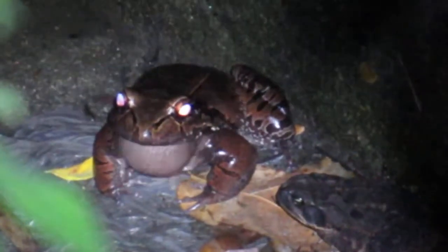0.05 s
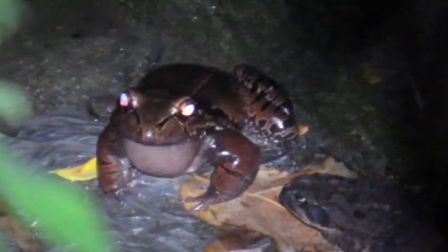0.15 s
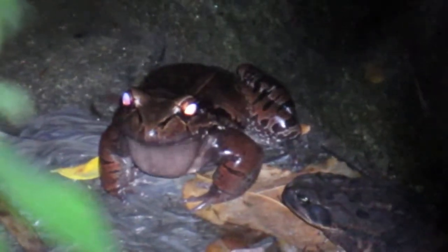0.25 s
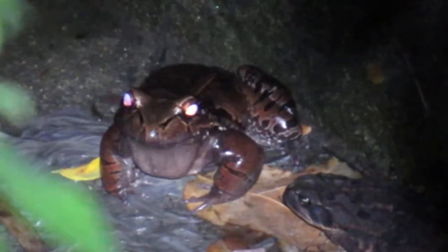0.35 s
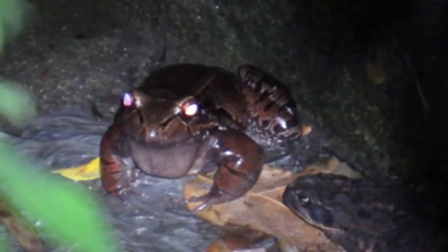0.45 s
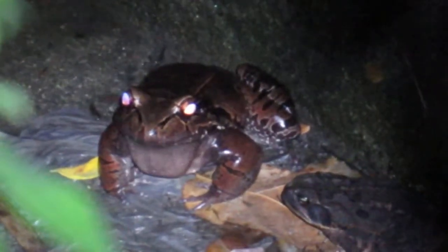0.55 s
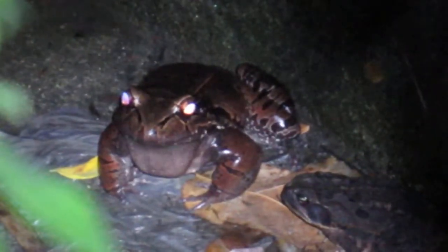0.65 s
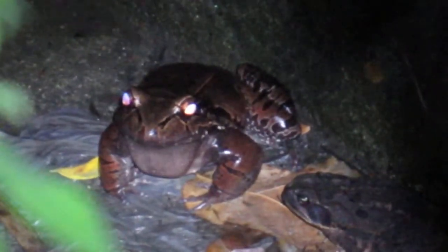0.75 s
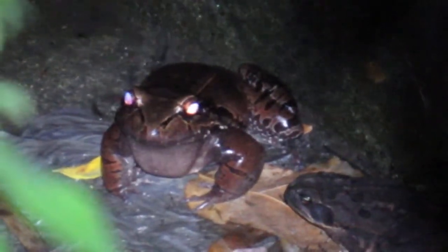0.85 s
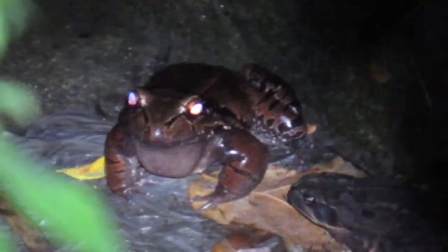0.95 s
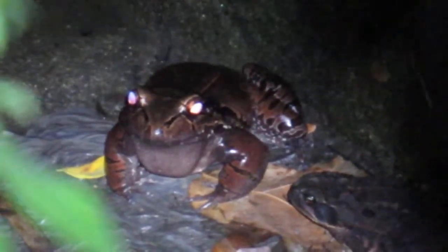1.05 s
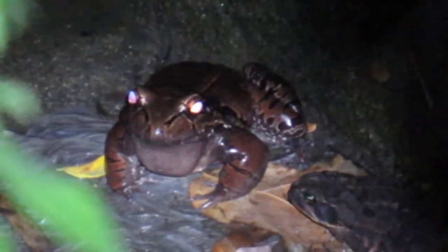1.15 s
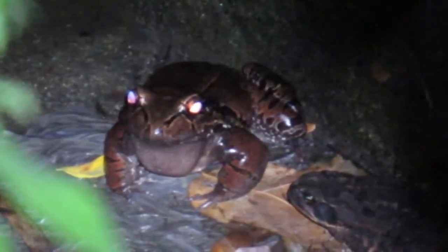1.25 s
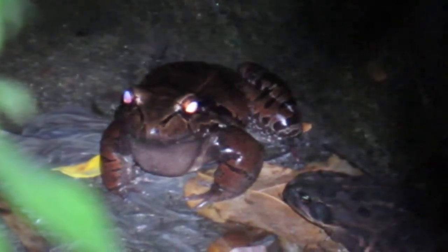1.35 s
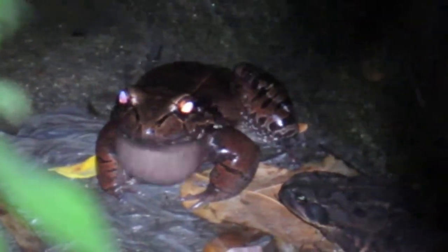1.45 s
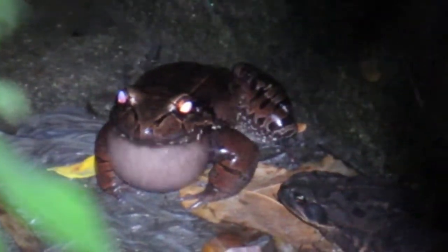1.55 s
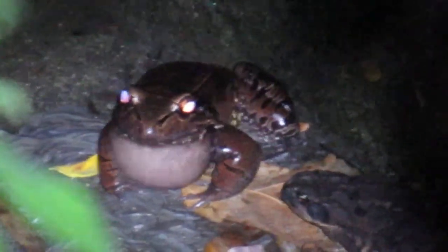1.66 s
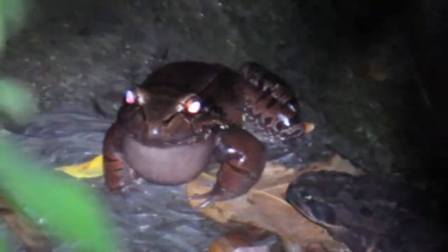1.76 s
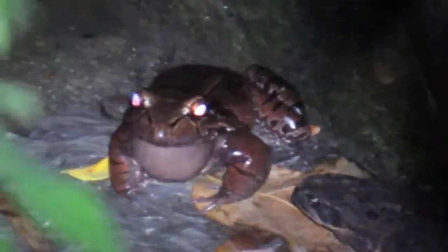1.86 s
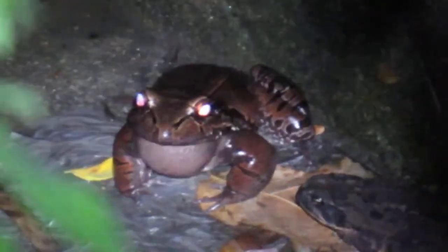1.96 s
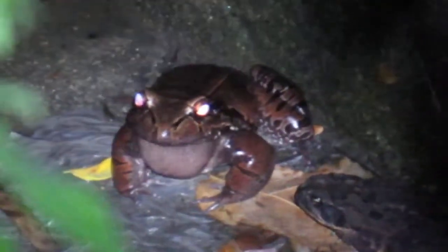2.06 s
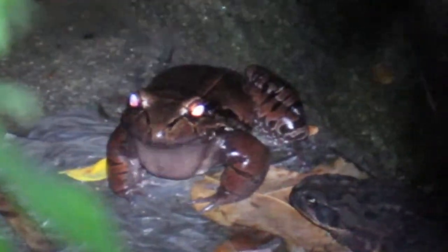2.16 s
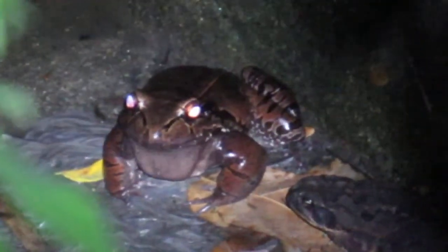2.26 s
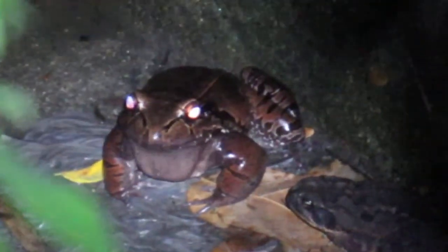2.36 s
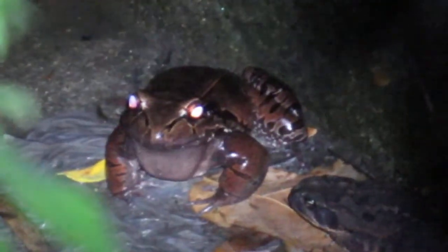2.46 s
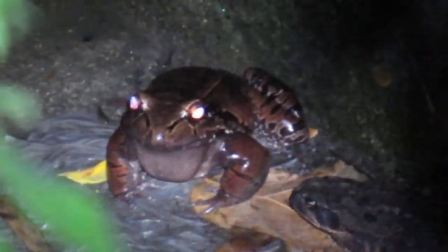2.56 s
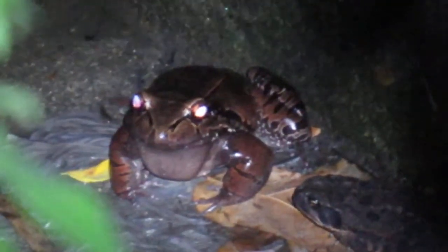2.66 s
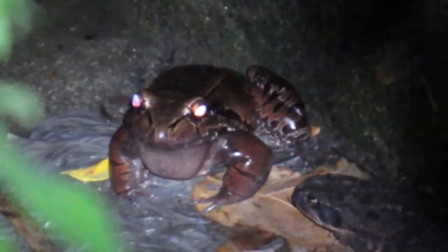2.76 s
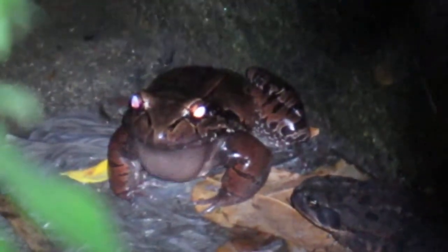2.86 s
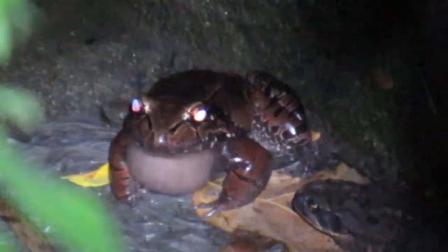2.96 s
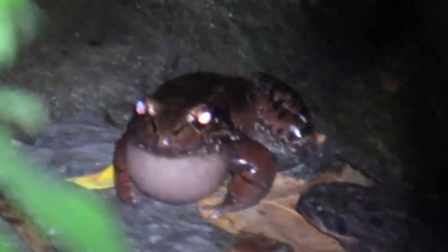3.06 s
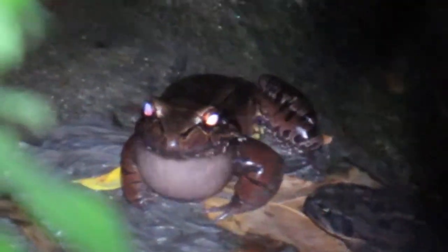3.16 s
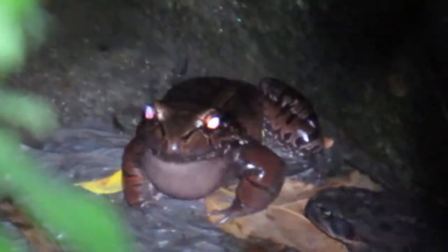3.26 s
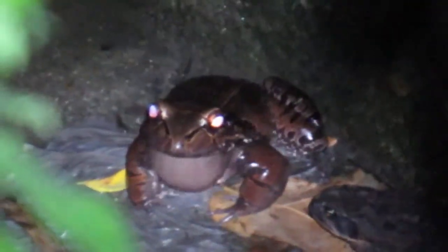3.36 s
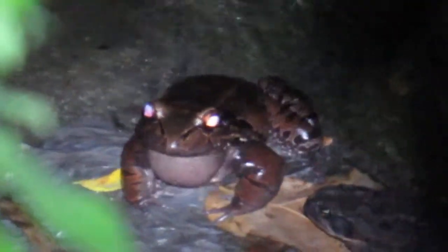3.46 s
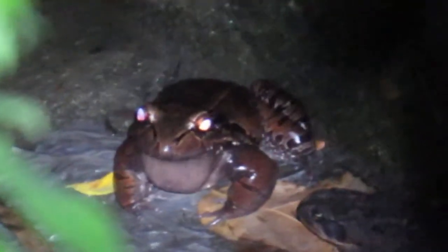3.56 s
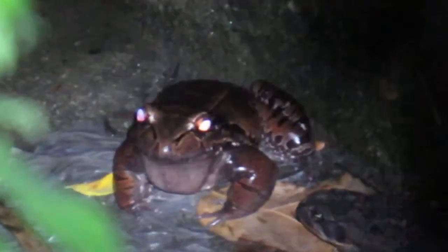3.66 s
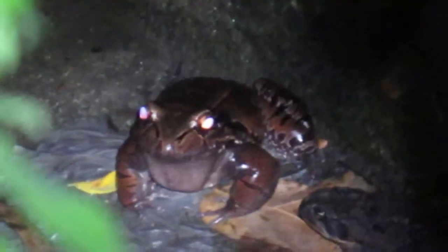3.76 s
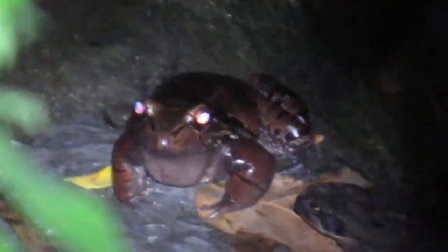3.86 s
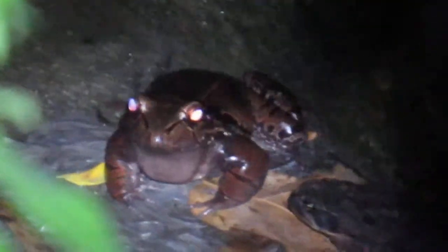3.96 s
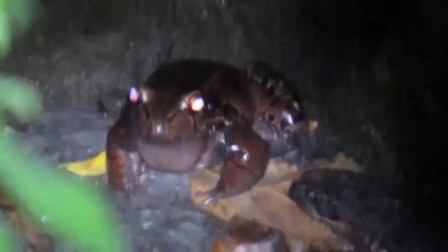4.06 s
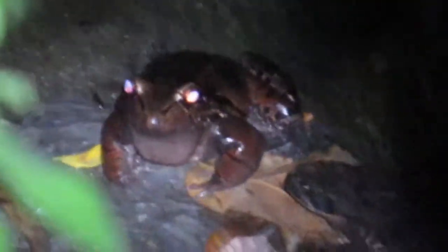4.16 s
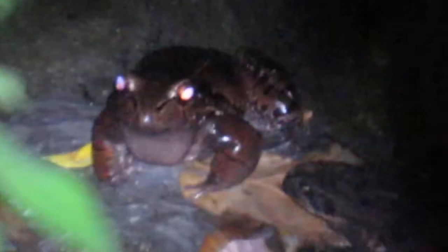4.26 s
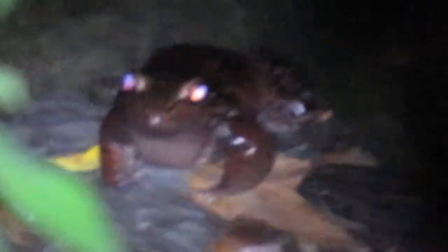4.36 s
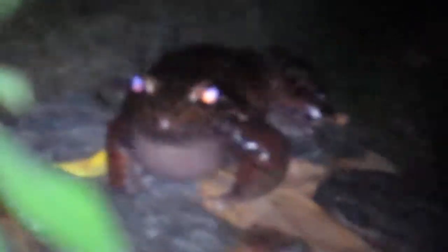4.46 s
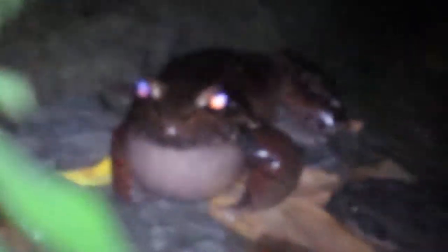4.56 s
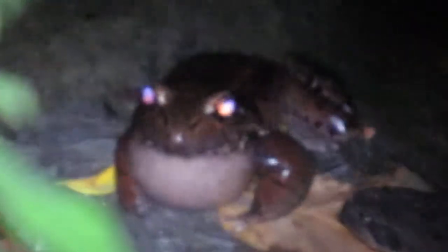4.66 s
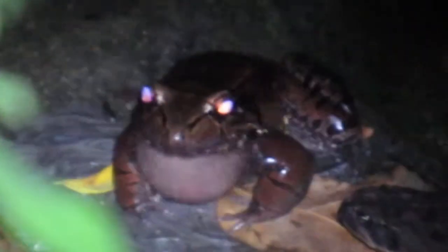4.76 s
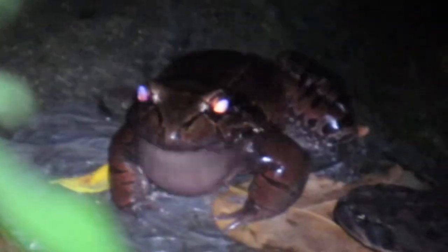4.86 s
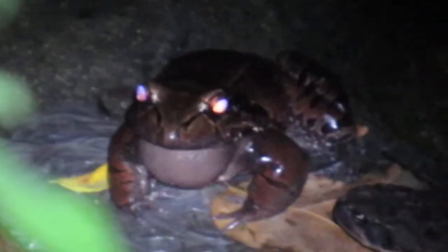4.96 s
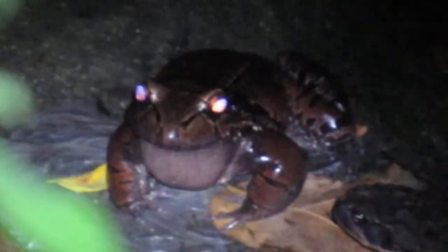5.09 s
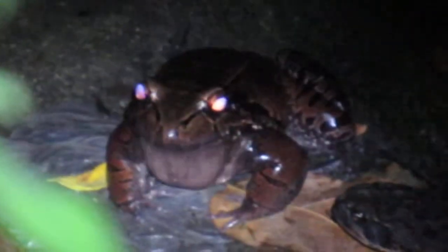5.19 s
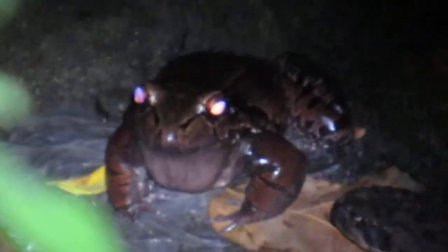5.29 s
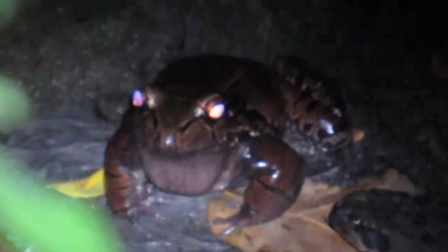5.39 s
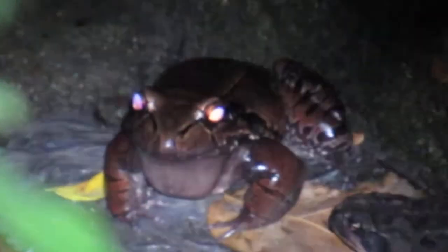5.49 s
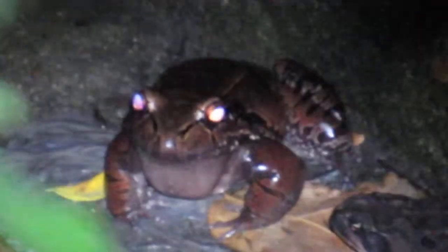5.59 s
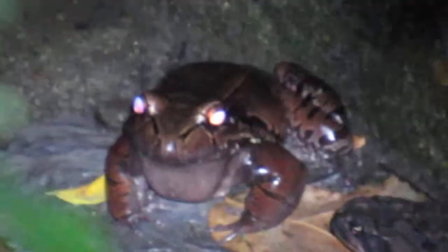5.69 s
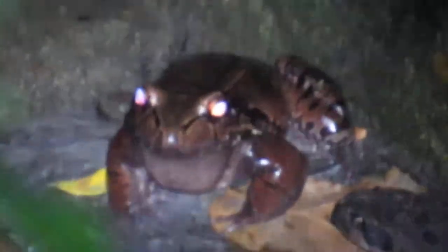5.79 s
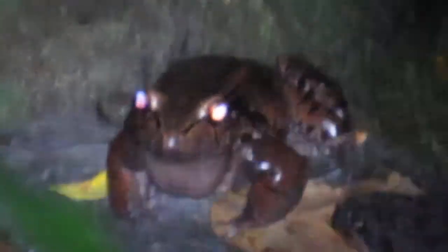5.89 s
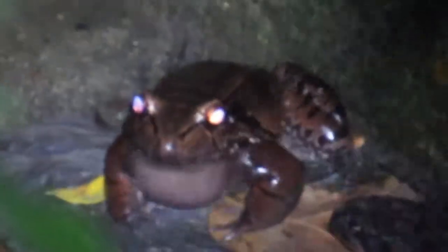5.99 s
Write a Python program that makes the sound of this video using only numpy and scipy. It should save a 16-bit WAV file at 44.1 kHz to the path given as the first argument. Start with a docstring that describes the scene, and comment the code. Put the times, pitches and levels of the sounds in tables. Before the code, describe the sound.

A big frog gives four short, low rising whoops at night, close by, over a steady high chorus of frogs and insects.

```python
"""A big frog whoops four times, close by on a forest floor at night; trunks and rocks throw each whoop back.
Behind it: far frog choruses, crickets, katydids, and a distant animal whose falling mew ends in a rasp.
Calls are gliding tones, insects pulsed tones or banded noise, and the night air is coloured noise.
A camera's lens drive rustles once, after a brief dip; the sound is duller for a while afterwards.
The stereo pair leans left, with the lowest bass in opposite phase."""
import sys
import numpy as np
from scipy import signal
from scipy.fft import rfft, irfft
from scipy.io import wavfile

SR = 44100
rng = np.random.default_rng(int(sys.argv[2]) if len(sys.argv) > 2 else 0)


def wav_out(sig):
    """Save sig, one row per channel (or a flat mono array), as 16-bit PCM at SR to the path in sys.argv[1]."""
    wavfile.write(sys.argv[1], SR, np.round(np.clip(np.atleast_2d(sig).T, -1, 1) * 32767).astype(np.int16))


N = 265923
TIME = np.arange(N) / SR
FREQS = np.fft.rfftfreq(N, 1 / SR)

# Night air and microphone hiss. Each row: frequency in Hz, density in dB per Hz.
AIR_SPECTRUM = [(20, -91.5), (70, -73), (250, -70.5), (420, -77), (750, -77), (1100, -74), (1900, -83),
                (2450, -91), (3000, -96), (5000, -98), (6000, -95), (8500, -100), (12000, -104),
                (15500, -111)]
# Likeness of that noise at the two ports. Each row: frequency in Hz, likeness from 0 to 1.
AIR_LIKENESS = [(60, 0.88), (1200, 0.94), (2400, 0.46), (4000, 0.8), (9000, 0), (14000, 0.4)]

CHIRPER_STROKES_PER_S, TRILLER_STROKES_PER_S = 14.1, 23.9
# Phrases of the buzzing cricket. Each row: loudest moment in seconds, level in dB.
BUZZES = [(-.12, -85.5), (.53, -65), (1.35, -58), (1.92, -58.5), (2.5, -58), (3.06, -59), (3.6, -59),
          (4.16, -60), (5.23, -57), (5.979, -56)]
BUZZ_SWELL_S, BUZZ_FADE_S = 0.14, .16

# Wing resonance of the far katydids. Each row: frequency in Hz, relative gain in dB.
SIZZLE_BAND = [(4800, -50), (5650, -4.5), (6050, -32.5), (6500, 3), (6950, 6.5), (7550, 2), (7900, -18),
               (8300, -45), (10000, -52)]
# Nearer phrases over the steady sizzle. Each row: start in seconds, end in seconds, level in dB.
SIZZLES = [(-.2, 0.748, -50.5), (0.976, 1.876, -54.5), (2.074, 2.776, -52.5)]
SIZZLE_BED_DB, SIZZLE_EDGE_S = -54, 0.12
# Pulsed katydid rasps. Each row: start in seconds, end in seconds, centre in Hz, pulses per second, level in dB.
KATYDID_RASPS = [(-.1, 0.27, 7370, 82, -43), (3.786, 4.147, 7410, 82, -44.5),
                 (4.943, 5.364, 7340, 82, -45.5), (1.157, 1.782, 7450, 110, -54),
                 (3.035, 3.45, 7660, 110, -58), (5.36, 5.72, 7700, 110, -59)]
KATYDID_RASP_WIDTH_HZ, KATYDID_RASP_EDGE_S = 380, 0.038
# Paired katydid lisps, the first softer. Each row: start in seconds, level of the second lisp in dB.
LISPS = [(.83, -57), (1.11, -51.5), (2.54, -55), (2.82, -50), (4.791, -54), (5.073, -49.5), (5.926, -51)]
LISP_PAIR_S, FIRST_LISP_DB = 0.0577, -4.5
# Runs of thin, high chirps. Each row: start in seconds, end in seconds, chirps per second, mean level in dB.
CHIRP_RUNS = [(0.18, .313, 18, -61), (.63, .8, 36, -61.5), (1.682, 1.98, 27, -63), (2.107, 2.36, 32, -58),
              (3.027, 3.22, 30, -59), (3.43, 3.58, 8, -58), (3.86, 4.05, 30, -58.5),
              (4.664, 4.863, 31, -60), (5.558, 5.753, 33, -58.5)]
CHIRP_HZ = 10170
# One louder insect sings a lower, slower run, two wing strokes to a chirp.
SOLO_START_S, SOLO_END_S, SOLO_HZ, SOLO_PER_S, SOLO_DB = 3.123, 4.2, 6900, 20, -43.5
SOLO_STROKE_GAP_S, SOLO_DROP_HZ = .011, 110

# Single hisses, ticks and a bump.
# Each row: start in seconds, centre in Hz, width in Hz, rise in seconds, decay in seconds, level in dB.
HISSES = [(1.418, 12000, 3000, .035, .05, -45.5), (3.21, 12000, 2600, .05, .08, -58),
          (3.42, 2400, 1500, .001, .004, -45), (4.178, 300, 400, .002, .006, -30),
          (4.495, 13000, 5000, .006, .012, -51)]

# The level dips, the lens drive runs from the end of the dip, and the sound stays duller for a while.
DIP_START_S, DIP_END_S, DIP_DB, ZOOM_END_S = 4.155, 4.2245, -15, 4.68
# Spectrum of the dullness. Each row: frequency in Hz, gain in dB.
DULL_SPECTRUM = [(600, 0.5), (1200, -0.5), (1600, -5), (2200, -14.5), (3500, -10.5), (4400, -8),
                 (6000, -4.5), (8000, 1)]
DULL_SHARE, DULL_HOLD_S, DULL_CLEAR_S = 0.95, 1.05, 1.1
# Right port against left. Each row: frequency in Hz, gain in dB, phase in radians.
RIGHT_PORT = [(200, 0, 3.14), (275, -4.5, 3.1), (400, -6.5, 2.95), (520, -6.8, 2.75), (900, -5, 2.4),
              (1500, -4.6, 1.55), (2400, -4, .75), (3300, -7, .3), (4400, -9.2, .3), (7200, -11.5, 0),
              (10000, -9, -.6), (15000, -3, -.6)]
TOP_HZ = 15800

# Calls of the distant animal.
# Each row: start in seconds, mew length in seconds, relative mew level in dB, closing rasp level in dB.
MEWS = [(.275, .385, 0, -43), (2.105, .378, 0, -43), (3.648, .395, -.5, -51), (5.215, .395, -.5, -44.5)]
# Its throat while it mews. Each row: frequency in Hz, gain in dB.
MEW_THROAT = [(400, 0), (850, 0), (1100, -16), (1800, -22), (2100, -18), (2350, -12), (2500, -16),
              (2680, -14), (2900, -26), (3200, -34), (4500, -55)]
# Its throat while it rasps. Each row: frequency in Hz, gain in dB.
RASP_THROAT = [(1000, -8), (1250, -2), (1800, -12), (2050, -7), (2300, -1), (2500, -3), (2670, 1),
               (2880, -14), (3400, -25)]
# Pitch drops fast at first, then ever more slowly.
MEW_START_HZ, MEW_KNEE_S, MEW_FALL_POWER, MEW_SAG_HZ_PER_S = 860, .04, .255, 80
MEW_DB, MEW_ATTACK_S, MEW_RELEASE_S = -36.5, .035, .13
# The mew fades as it slides through a hollow in its spectrum.
HOLLOW_HZ, HOLLOW_WIDTH_HZ, HOLLOW_DB = 640, 52, -17

# Frog whoops. Each row: start in seconds, relative level in dB.
WHOOPS = [(1.389, -2.5), (2.868, -2.6), (4.407, -2.5), (5.958, -1.5)]
# Echoes from trunks and rocks. Each row: delay in seconds, level against the whoop in dB.
ECHOES = [(.047, -25), (.125, -23), (.21, -32)]
WHOOP_ATTACK_S, WHOOP_HOLD_S, WHOOP_RELEASE_S, WHOOP_SWELL_POWER, WHOOP_DB = .138, 0.0421, 0.0766, 1.24, -8
# Pitch climbs as a power of time.
WHOOP_TOP_HZ, WHOOP_CLIMB_POWER = 505.3, .218
# The flutter sets in just before its first crest, then settles; the level throbs slightly ahead of it.
FLUTTER_HZ, FLUTTER_CREST_S = 29.6, .051
FLUTTER_DEPTH_HZ, FLUTTER_ONSET_S, FLUTTER_SETTLE_S = 57.6, .033, 0.062
THROB_DB_PER_HZ, THROB_LEAD_S = .04, .007


def undb(db):
    """Decibels to gain."""
    return 10 ** (np.asarray(db) / 20)


def by_frequency(rows, axis=1):
    """One column of a table, joined on a log-frequency axis."""
    rows = np.array(rows)
    return np.interp(np.log(FREQS + 1), np.log(rows[:, 0]), rows[:, axis])


def colour(x, gain):
    """Filter by a gain for each frequency."""
    return irfft(rfft(x) * gain, N)


def level(x, db=0):
    """Scale to an rms level."""
    return x * undb(db) / np.sqrt(np.mean(x ** 2) + 1e-20)


def hiss(hz, width_hz):
    """Noise in one bell-shaped band, rms 1."""
    return level(colour(rng.standard_normal(N), 2 ** (-2 * ((FREQS - hz) / width_hz) ** 2)))


def walk(rate_hz):
    """Random drift, lowpassed around a rate, rms 1."""
    return level(colour(rng.standard_normal(N), np.exp(-(FREQS / rate_hz) ** 2)))


def gate(start, end, edge):
    """One between two times, with sloping edges inside them."""
    return np.clip(np.minimum(TIME - start, end - TIME) / edge, 0, 1)


def swell(peak, rise, fade):
    """A bell-shaped rise to one moment and fade after it."""
    return np.exp(-((TIME - peak) / np.where(TIME < peak, rise, fade)) ** 2)


def turn(hz):
    """Running phase of a pitch."""
    return 2 * np.pi * np.cumsum(hz) / SR


def add(out, start, x):
    """Mix a short sound in at a time."""
    i = max(int(start * SR), 0)
    out[i:i + len(x)] += x[:max(N - i, 0)]


def notes(times, pitches, levels_db, length, fall):
    """Short rounded notes whose pitch falls by a share of itself."""
    out, u = np.zeros(N), np.linspace(0, 1, int(length * SR))
    for start, hz, db in zip(times, pitches, levels_db):
        tone = np.sin(turn(hz * (1 - fall * (u - .5))))
        add(out, start, np.sqrt(2) * undb(db) * np.sin(np.pi * u) * tone)
    return out


def chorus(hz, spread_hz, length, fall, db, count):
    """Many far callers, each note with its own moment, pitch and strength."""
    chance = rng.standard_normal((count, 3))
    times = (np.arange(count) + chance[:, 2]) / count * N / SR
    pitches = hz + spread_hz * np.tanh(chance[:, 0] / 2) * 2
    return level(notes(times, pitches, 2 * chance[:, 1], length, fall), db)


def forest(x, wet_db, t60):
    """Leaves and trunks scatter a different decaying tail to each port."""
    tail = rng.standard_normal((2, SR)) * undb(-60 * TIME[:SR] / t60)
    tail *= undb(wet_db) / np.sqrt(np.sum(tail ** 2, axis=1, keepdims=True))
    wet = signal.fftconvolve(x[None], tail, axes=1)[:, :N]
    return (x + wet) / np.sqrt(1 + undb(wet_db) ** 2)


def air():
    """Soft, nearly steady noise: a part shared by the ports and a part separate to each, by frequency."""
    likeness = by_frequency(AIR_LIKENESS)
    shared = colour(rng.standard_normal(N), np.sqrt(likeness))
    separate = colour(rng.standard_normal((2, N)), np.sqrt(1 - likeness))
    density = undb(by_frequency(AIR_SPECTRUM)) * np.sqrt(SR / 2)
    return colour(shared + separate, density) * undb(.5 * walk(1.5))


def far_frogs():
    """Far choruses: a murmur of soft hoots, a dense higher rattle in small surges, and a lower rattle."""
    hoots = chorus(hz=544, spread_hz=32.6, length=0.021, fall=0, db=-44.0, count=900)
    rattle = chorus(hz=1486.7, spread_hz=63.3, length=0.0065, fall=0, db=-39.5, count=3200)
    rattle *= undb(1.43 * walk(8.8))
    low_rattle = chorus(hz=1339, spread_hz=52, length=0.008, fall=0, db=-47, count=1500)
    return forest(hoots + rattle + low_rattle, wet_db=-14.5, t60=0.38)


def cricket(hz, rate, duty, fall, waver, db):
    """Each wing stroke rings the wing's own tone, which sags as the stroke slows."""
    cycle = turn(rate * (1 + 0.015 * walk(4.9))) / (2 * np.pi) % 1
    stroke = np.minimum(cycle / duty, 1)
    pitch = hz * (1 - fall * (stroke - .5) + waver * walk(97.7))
    return level(np.sin(np.pi * stroke) * np.sin(turn(pitch)) * undb(2 * walk(13)), db)


def buzzer():
    """Fast pulses split a cricket's tone into lines; it comes in phrases."""
    pulses = np.exp(2.2 * np.cos(turn(174 + 1.3 * walk(9.7))))
    tone = np.sin(turn(4983 + 6 * walk(15)))
    phrases = sum(undb(db) * swell(peak, BUZZ_SWELL_S, BUZZ_FADE_S) for peak, db in BUZZES)
    return level(pulses * tone) * phrases * undb(2.9 * walk(30))


def crickets():
    """Two near singers pulse wing tones over a crowd of short notes and a buzzer."""
    chirper = cricket(hz=4467, rate=CHIRPER_STROKES_PER_S, duty=.8, fall=.012, waver=0.00402, db=-50.5)
    triller = cricket(hz=4286, rate=TRILLER_STROKES_PER_S, duty=.8, fall=.004, waver=0.00207, db=-49.5)
    crowd = chorus(hz=4264, spread_hz=85, length=0.012, fall=0.039, db=-48.5, count=1500)
    low_crowd = chorus(hz=3515, spread_hz=180, length=0.024, fall=0.027, db=-60.5, count=600)
    low_crowd *= undb(2.8 * walk(7.6))
    return forest(chirper + triller + crowd + low_crowd + buzzer(), wet_db=-9, t60=.25)


def katydid_sizzle():
    """Far katydids merge into banded noise; phrases of nearer ones add power to it."""
    noise = level(colour(rng.standard_normal(N), undb(by_frequency(SIZZLE_BAND))))
    power = undb(SIZZLE_BED_DB) ** 2
    for start, end, db in SIZZLES:
        power = power + (undb(db) * gate(start, end, SIZZLE_EDGE_S)) ** 2
    return noise * np.sqrt(power) * undb(0.5 * walk(33))


def katydid_rasps():
    """Each wing stroke is one rounded swell of banded noise, never quite silent between strokes."""
    out = np.zeros(N)
    for start, end, hz, rate, db in KATYDID_RASPS:
        phase = 2 * np.pi * rate * (TIME - start)
        strokes = level(np.exp(0.46 * np.cos(phase) + 0.051 * np.cos(3 * phase)))
        noise = hiss(hz, KATYDID_RASP_WIDTH_HZ)
        out += noise * strokes * gate(start, end, KATYDID_RASP_EDGE_S) * undb(db)
    return out


def katydid_lisps(stroke_gap_s=0.015, decay_s=0.0071):
    """Paired lisps, each three quick scrapes of broad high noise."""
    envelope, t = np.zeros(N), TIME[:SR // 20]
    scrape = t / decay_s * np.exp(2 - 2 * t / decay_s)
    for start, db in LISPS:
        for k in range(3):
            add(envelope, start + k * stroke_gap_s, undb(db + FIRST_LISP_DB) * scrape)
            add(envelope, start + LISP_PAIR_S + k * stroke_gap_s, undb(db) * scrape)
    return envelope * (undb(-6) * hiss(9240, 1400) + undb(-2) * hiss(9400, 2800))


def chirp_run(start, end, hz, rate, db, length, fall):
    """Almost evenly paced falling chirps, each a little different."""
    times = np.arange(start, end, 1 / rate)
    chance = rng.standard_normal((len(times), 3))
    pitches = hz * (1 + 0.005 * chance[:, 0])
    return notes(times + 0.0015 * chance[:, 2], pitches, db + 1.6 * chance[:, 1], length, fall)


def insect_chirps():
    """Wing strokes as short falling tones: thin high runs and one lower solo."""
    out = np.zeros(N)
    for start, end, rate, db in CHIRP_RUNS:
        out += chirp_run(start, end, CHIRP_HZ, rate, db, length=.018, fall=.08)
    for k in range(2):
        start, hz = SOLO_START_S + k * SOLO_STROKE_GAP_S, SOLO_HZ - k * SOLO_DROP_HZ
        out += chirp_run(start, SOLO_END_S, hz, SOLO_PER_S, SOLO_DB, length=0.0152, fall=.06)
    return out


def katydids():
    """Wing-scrape noise and insect chirps, scattered by the same leaves."""
    dry_insects = katydid_sizzle() + katydid_rasps() + katydid_lisps() + insect_chirps()
    return forest(dry_insects, wet_db=-4.0, t60=0.32)


def hisses():
    """Brief bands of noise that rise in a line and die away exponentially."""
    out = np.zeros(N)
    for start, hz, width_hz, rise, decay, db in HISSES:
        age = np.maximum(TIME - start, 0)
        envelope = np.minimum(age / rise, 1) * np.exp(-np.maximum(age - rise, 0) / decay)
        out += hiss(hz, width_hz) * undb(db) * envelope
    return forest(out, wet_db=3, t60=.1)


def camera():
    """The lens drive whispers and rustles as banded noise while it moves; the electronics whine very faintly."""
    drive = undb(-63.0) * hiss(10600, 2400) + undb(-52.5) * hiss(2400, 930)
    drive *= gate(DIP_END_S, ZOOM_END_S, 0.0079) * undb(2 * walk(60))
    whine = undb(-78) * np.sin(2 * np.pi * 15734 * TIME)
    return forest(drive, wet_db=6, t60=0.0083) + whine


def mew(length):
    """A gliding fundamental with wavering overtones that come out most in the middle; quick start, slow fade."""
    t = TIME[:int(length * SR)]
    phase = turn(MEW_START_HZ / (1 + t / MEW_KNEE_S) ** MEW_FALL_POWER - MEW_SAG_HZ_PER_S * t)
    effort = np.minimum(t / MEW_ATTACK_S, 1) * np.minimum((length - t) / MEW_RELEASE_S, 1) ** .5
    overtones = np.zeros(len(t))
    for k in range(3, 7):
        overtones += np.sin(k * phase) / np.sqrt(k) * undb(4 * walk(20)[:len(t)] - 2)
    return np.sqrt(2) * effort * (np.sin(phase) + np.sin(np.pi * t / length) * overtones)


def closing_rasp(end_hz=202, length_s=0.0857, fall=0.0923, jitter=0.01):
    """Upper harmonics of a low, falling, unsteady pitch in one rounded burst."""
    u = np.linspace(0, 1, int(length_s * SR))
    phase = turn(end_hz * (1 + fall * (1 - u) ** 2 + jitter * walk(150)[:len(u)]))
    return np.sin(np.pi * u) ** 2 * sum(np.sin(k * phase) for k in range(5, 16))


def distant_animal():
    """A mew slides down through a fixed throat resonance, then breaks into a short low rasp."""
    mews, rasps = np.zeros(N), np.zeros(N)
    for start, length, db, rasp_db in MEWS:
        add(mews, start, undb(MEW_DB + db) * mew(length))
        add(rasps, start + length, undb(rasp_db) * closing_rasp())
    hollow_db = HOLLOW_DB * np.exp(-((FREQS - HOLLOW_HZ) / HOLLOW_WIDTH_HZ) ** 2)
    mews = colour(mews, undb(by_frequency(MEW_THROAT) + hollow_db))
    rasps = colour(rasps, undb(by_frequency(RASP_THROAT)))
    return forest(mews + rasps, wet_db=-10, t60=.4)


def frog():
    """The vocal sac passes an almost pure rising tone; a flutter in pitch and strength settles as the sac fills."""
    length = WHOOP_ATTACK_S + WHOOP_HOLD_S + WHOOP_RELEASE_S
    t = TIME[:int(length * SR)]
    attack = np.minimum(t / WHOOP_ATTACK_S, 1) ** WHOOP_SWELL_POWER
    release = np.minimum((length - t) / WHOOP_RELEASE_S, 1)
    age = t - FLUTTER_CREST_S
    onset = np.clip(1 + age / FLUTTER_ONSET_S, 0, 1)
    settling = np.exp(-np.maximum(age, 0) / FLUTTER_SETTLE_S)
    flutter_hz = FLUTTER_DEPTH_HZ * onset * settling * np.cos(2 * np.pi * FLUTTER_HZ * age)
    phase = turn(WHOOP_TOP_HZ * (t / length) ** WHOOP_CLIMB_POWER + flutter_hz)
    tone = np.sin(phase) + undb(-41.5) * np.sin(2 * phase) + undb(-57) * np.sin(3 * phase)
    throb_db = THROB_DB_PER_HZ * np.interp(t + THROB_LEAD_S, t, flutter_hz)
    whoop = np.sqrt(2) * tone * attack * release * undb(WHOOP_DB + throb_db)
    out = np.zeros(N)
    direct = (0.0013, 0.01)  # delay in seconds, level in dB
    for start, db in WHOOPS:
        for delay, path_db in [direct] + list(ECHOES):
            add(out, start + delay, whoop * undb(db + path_db))
    return forest(out, wet_db=-20, t60=0.31)


def scene():
    """Everything that reaches the two ports."""
    background = air() + far_frogs() + crickets() + katydids()
    return background + hisses() + camera() + distant_animal() + frog()


def record(dry):
    """Filters the right port in gain and phase, dips the level once, dulls then clears, and cuts the top."""
    right_gain = undb(by_frequency(RIGHT_PORT, axis=1))
    right_phase = by_frequency(RIGHT_PORT, axis=2)
    pair = np.array([dry[0], colour(dry[1], right_gain * np.exp(1j * right_phase))])
    clearing = np.clip((TIME - DIP_END_S - DULL_HOLD_S) / DULL_CLEAR_S, 0, 1)
    dull = DULL_SHARE * (TIME > DIP_END_S) * (1 - clearing)
    pair = (1 - dull) * pair + dull * colour(pair, undb(by_frequency(DULL_SPECTRUM)))
    pair = pair * undb(DIP_DB * gate(DIP_START_S, DIP_END_S, 0.00082))
    lowpass = signal.ellip(10, .1, 80, TOP_HZ, fs=SR, output="sos")
    return signal.sosfilt(lowpass, pair)


dry = scene()
out = record(dry)
wav_out(out)
```